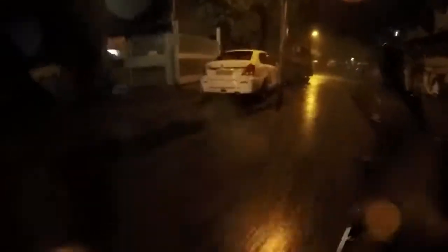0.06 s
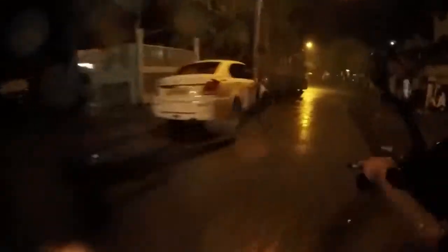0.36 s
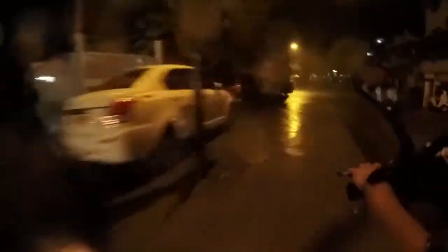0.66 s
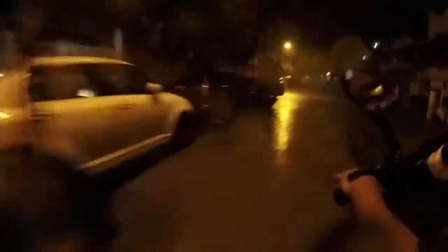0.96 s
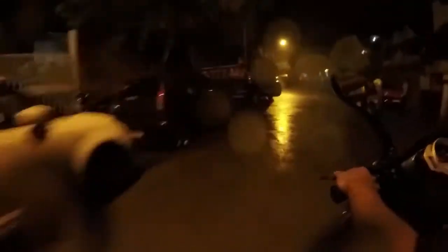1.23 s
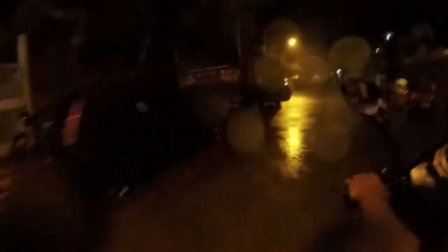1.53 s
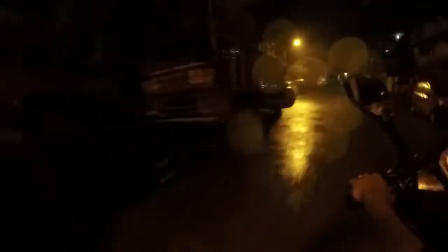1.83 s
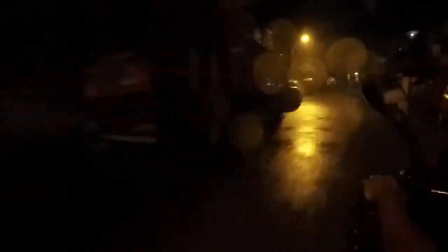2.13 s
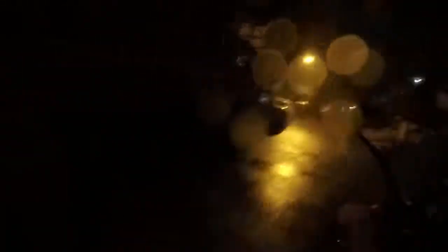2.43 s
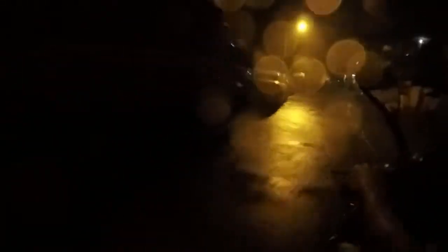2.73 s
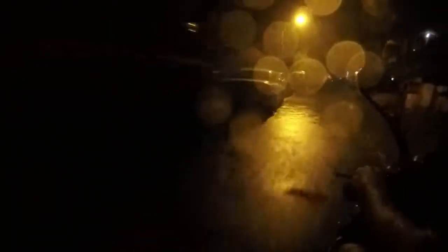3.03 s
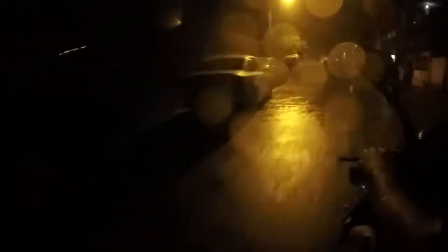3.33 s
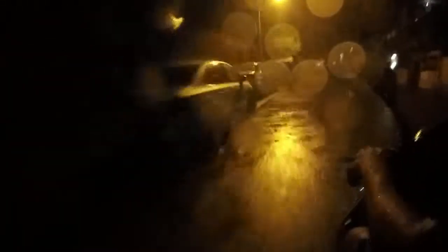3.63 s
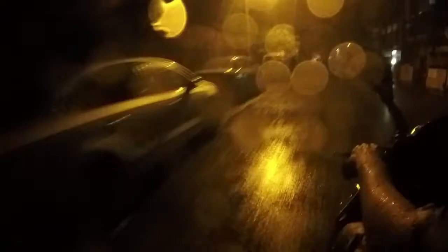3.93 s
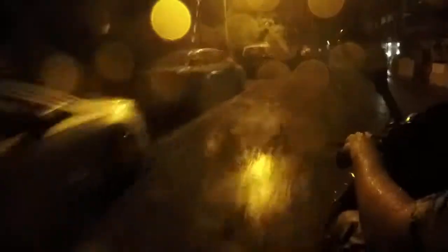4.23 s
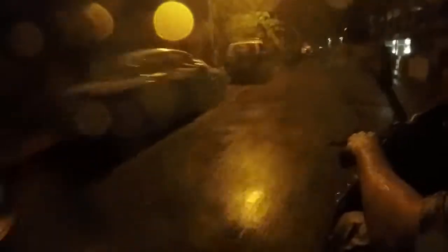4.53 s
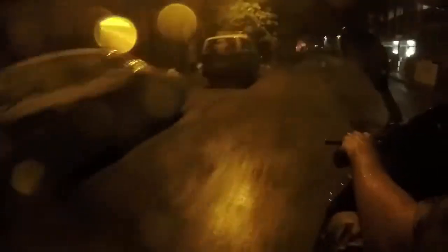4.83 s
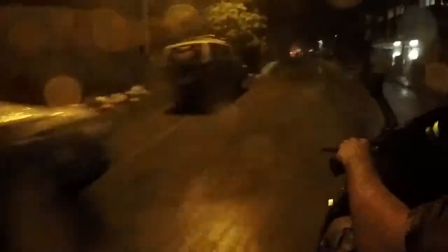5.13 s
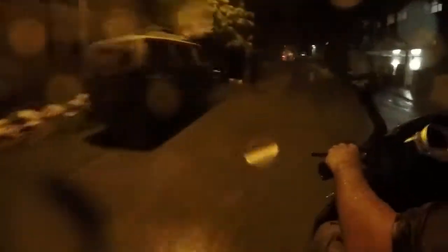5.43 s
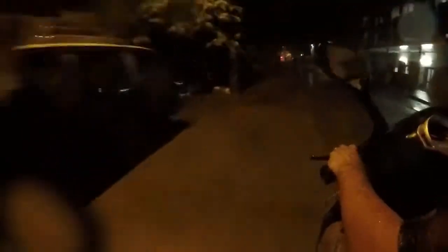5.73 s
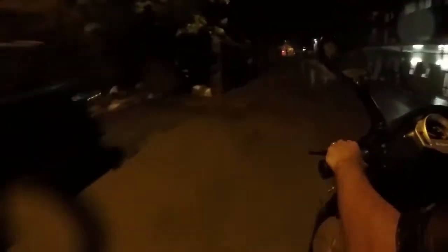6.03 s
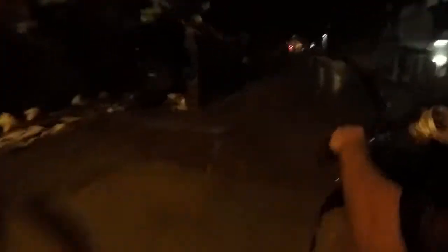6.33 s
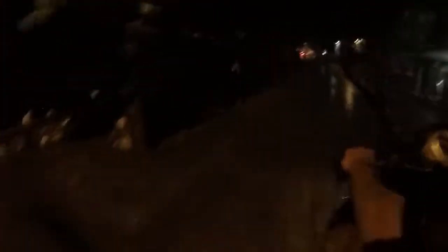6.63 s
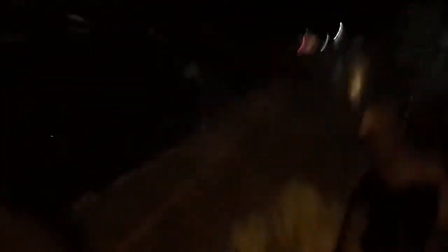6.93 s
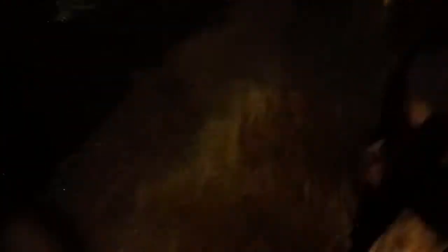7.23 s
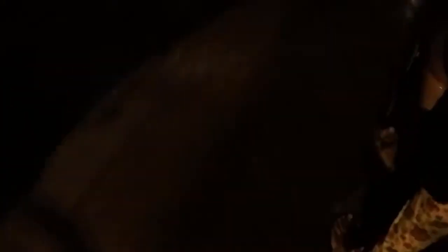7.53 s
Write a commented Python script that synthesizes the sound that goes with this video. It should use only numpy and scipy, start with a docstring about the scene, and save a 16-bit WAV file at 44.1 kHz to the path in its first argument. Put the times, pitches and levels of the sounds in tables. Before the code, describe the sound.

Raindrops strike a plastic camera case on a scooter riding along a wet street. Sharp, irregular taps and finer ticks crackle throughout, with an occasional hollow plop or soft low knock. Underneath run a low wind rumble, road hum, muffled tyre spray and a faint engine. The wind swells at the start and again near the end. The microphone is inside the case, so the drops sound very close.

```python
"""Rain on a scooter's camera case

A scooter rides along a wet street in the rain, with a camera in a waterproof plastic case.
Each drop excites the case's modes for a few milliseconds; the hardest overload the microphone.
Underneath are wind rumble, road hum, tyre spray heard through the shell, a faint engine
and a few low thuds: soft knocks of the mount and brief thumps of overload."""
import sys
import numpy as np
from scipy import signal
from scipy.fft import rfft, irfft, next_fast_len
from scipy.io import wavfile
from scipy.ndimage import map_coordinates

SR = 44100
rng = np.random.default_rng(int(sys.argv[2]) if len(sys.argv) > 2 else 0)


def to_wav(s):
    """Save 16-bit WAV."""
    ch = np.atleast_2d(s).T  # columns
    pcm = np.round(np.clip(ch, -1, 1) * 32767)  # PCM
    wavfile.write(sys.argv[1], SR, pcm.astype(np.int16))


N = 338247
TIME = np.arange(N) / SR


def amp(db):
    """Amplitude ratio of a level in decibels."""
    return 10 ** (np.asarray(db) / 20)


def unit(x):
    """Normalisation to rms 1."""
    return x / np.sqrt(np.mean(x ** 2) + 1e-20)


def wobble(rate):
    """Smooth random modulation: a spline through `rate` Gaussian knots a second."""
    return map_coordinates(rng.standard_normal(int(N * rate / SR) + 4), [TIME * rate])


def filtered(x, response):
    """Zero-phase filtering: the spectrum times a response of frequency."""
    size = next_fast_len(N + 8192)
    return irfft(rfft(x, size) * response(np.fft.rfftfreq(size, 1 / SR)), size)[:N]


def noise(spectrum):
    """Coloured noise of rms 1: white noise shaped by a spectral envelope."""
    knots_hz, db = np.transpose(spectrum)
    white = rng.standard_normal(N)
    return unit(filtered(white, lambda hz: amp(np.interp(np.log(hz + 1), np.log(knots_hz), db))))


def butter(x, edge_hz, kind, order):
    """Causal high- or low-pass filtering."""
    return signal.sosfilt(signal.butter(order, edge_hz, kind, fs=SR, output="sos"), x)


def ring(t, hz, t60):
    """Free vibration of a damped mode, falling 60 dB in t60 seconds."""
    return np.sin(2 * np.pi * hz * t) * np.exp(-np.log(1000) * t / t60)


def tap_unit(rows):
    """Energy normalisation: each row equals five milliseconds at rms 1."""
    return rows / np.sqrt(np.sum(rows ** 2, axis=1, keepdims=True) / (.005 * SR) + 1e-20)


def placed(times, rows):
    """Superposition of short sounds at their start times."""
    index = np.round(times * SR).astype(int)[:, None] + np.arange(rows.shape[1])
    return np.bincount(index.ravel(), rows.ravel(), N)[:N]


# Rush of the tyres over the wet road: (time [s], level [dB])
ROAD_RUSH = [(0.0, -40), (0.1, -40), (0.45, -49), (1.07, -51.5), (1.71, -46), (2.16, -47), (2.5, -41),
             (3.33, -45), (3.8, -40.5), (4.38, -47), (5.06, -49), (5.26, -46), (5.7, -48), (5.85, -44),
             (6.13, -50), (6.75, -47), (7.18, -50.5), (7.67, -46)]

def pace(cruise_db=-46):
    """Common modulation: the rush in dB above cruising; a source gains `grows` dB for each dB of it."""
    return np.interp(TIME, *np.transpose(ROAD_RUSH)) - cruise_db


# Gusts on the case: (start [s], length before release [s], rise of the rumble [dB])
GUSTS = [(0, 0.53, 7.5), (2.343, 0.088, 7), (3.804, 0.22, 7), (6.77, 0.73, 8)]

def gusts(attack_s=0.066, release_s=0.068):
    """Trapezoidal envelopes in dB: each gust rises, holds and lets go."""
    return sum(db * np.clip(np.minimum((TIME - start) / attack_s, 1 + (start + length - TIME) / release_s),
                            0, 1) for start, length, db in GUSTS)


# Spectrum of the wind rumble: (frequency [Hz], relative density [dB])
WIND_SPECTRUM = [(4, -19), (12, 7), (26, 2), (45, -3.5), (75, -9), (110, -18), (170, -21), (300, -33.5),
                 (700, -44.5)]

def wind(level_db=-45, grows=0.54):
    """Turbulent pressure buffets the case with a low rumble."""
    buffet_db = 2.1 * wobble(16)
    return amp(level_db + grows * pace() + gusts() + buffet_db) * noise(WIND_SPECTRUM)


# Spectrum of the shaken mount: (frequency [Hz], relative density [dB])
HUM_SPECTRUM = [(90, -8), (160, -1.5), (200, 6), (240, -9), (320, -13.5), (700, -37.5)]

def road_hum(level_db=-54.5, grows=1.13):
    """Forced vibration: the road shakes the mount, which resonates near 200 Hz."""
    shudder_db = 2.5 * wobble(18)
    return amp(level_db + grows * pace() + shudder_db) * noise(HUM_SPECTRUM)


# Spectrum of the spray inside the case: (frequency [Hz], relative density [dB])
SPRAY_SPECTRUM = [(150, -11), (450, -9), (800, -5.5), (1200, -5.5), (1400, -3.5), (1750, 0.5), (2150, -6.5),
                  (2450, -0.5), (3600, -12), (4650, -8), (5600, -20), (6700, -12), (8200, -41),
                  (15000, -47)]

def tyre_spray(level_db=-47.0, grows=0.94):
    """Transmission through the shell colours the hiss of tyres on wet asphalt."""
    sputter_db = .8 * wobble(25) + 1.9 * wobble(160)
    return amp(level_db + grows * pace() + sputter_db) * noise(SPRAY_SPECTRUM)


def engine(firing_hz=66, level_db=-59, grows=0.71, jitter=0.037):
    """Periodic firing gives a harmonic series; the third order falls on the mount's resonance."""
    phase = 2 * np.pi * np.cumsum(firing_hz * (1 + jitter * wobble(24))) / SR
    orders = sum(amp(db + 2.5 * wobble(23)) * np.sin(k * phase) for k, db in enumerate([0, -12, -3], 1))
    return amp(level_db + grows * pace()) * unit(orders)


# Modes of the plastic case: (frequency [Hz], relative level [dB], decay time t60 [s])
CASE_MODES = [(999, -14, 0.014), (1219, -1.5, 0.012), (1410, 3, 0.0084), (1716, -5.5, .015),
              (1937, -5, 0.014), (2397, -6.5, 0.021), (2714, -2.5, 0.018), (2810, -2, 0.013),
              (3307, 0, 0.0084), (3737, -6, 0.012), (4240, -2, 0.01), (4952, -6, 0.0085),
              (5320, -9, 0.0096), (6580, -16.5, 0.01), (10550, -3.5, 0.0033)]

def taps(times, db, spot_hz, bright_db, shell_db=-3, focus_db=6, focus_octaves=0.17, scatter_db=2.0,
         contact_s=0.00067, splash_db=-1, splash_t60=0.004, push_db=-27):
    """Impact excitation: a drop rings the spot it hits, spreads into the shell's modes and splashes."""
    t = np.arange(SR // 20) / SR
    hz, mode_db, t60 = np.transpose(CASE_MODES)
    spot = tap_unit(-ring(t, spot_hz[:, None], t60=0.0038))
    # modes near the spot's own pitch take more of the blow; the landing place sets their signs
    near = np.exp(-(np.log2(hz / spot_hz[:, None]) / focus_octaves) ** 2)
    side, scatter = rng.standard_normal((2, len(times), len(hz)))
    shares = np.sign(side) * amp(mode_db + focus_db * near + scatter_db * scatter)
    shell = tap_unit(shares @ ring(t, hz[:, None], t60[:, None]))
    # the force builds while the drop flattens; the stiff wall passes little below its modes
    rise = 1 - np.exp(-t / contact_s)
    body = tap_unit(butter(rise * (spot + amp(shell_db) * shell), 590, "high", order=3))
    burst = rise * rng.standard_normal((len(times), len(t))) * np.exp(-np.log(1000) * t / splash_t60)
    splash = tap_unit(butter(butter(burst, 2300, "high", order=2), 1780, "low", order=1))
    # the weight of the drop also gives the whole case one brief push
    push = tap_unit(ring(t, hz=430, t60=0.00059)[None])
    sounds = body + amp(bright_db + splash_db)[:, None] * splash + amp(push_db) * push
    return butter(placed(times, amp(db)[:, None] * sounds), 10200, "low", order=2)


# Big drops on the case: (time [s], level [dB], pitch of the struck spot [Hz], splash brightness [dB])
BIG_DROPS = [(.0257, -18, 2270, -9), (.09, -17.5, 1390, -6.5), (.2472, -15, 2710, -2),
             (.2854, 1, 1560, -19), (.4055, -19.5, 1390, -5), (.4404, -22.5, 2830, -6.5),
             (.7703, -2.5, 1834, -8.5), (0.7859, -24.5, 2190, -12), (.9174, -20.5, 1620, -6.5),
             (.933, -26, 1970, -12), (1.029, -13, 2580, -8), (1.0614, -30, 2300, 0.5),
             (1.077, -27, 2560, -22), (1.23, -19, 2430, -9), (1.315, -18, 2240, -18),
             (1.394, -12.5, 3780, -7.5), (1.4962, -33.5, 2750, -7), (1.6015, -20.5, 3300, -12.5),
             (1.746, -26, 2330, 0.5), (1.8569, -9, 2570, -4), (1.8721, -10.5, 2140, -33),
             (1.883, -5, 2620, -28), (2.0051, -23.5, 1400, -5), (2.0503, -6.5, 1740, -13.5),
             (2.1617, -17.5, 2410, -9.5), (2.3464, -19, 3000, -11), (2.3928, -18.5, 2960, -19),
             (2.4235, -23, 1640, -21), (2.4654, -29.5, 3300, 0.5), (2.52, -11.5, 1700, -25),
             (2.5644, -13.5, 1440, -3), (2.6047, -26, 2560, -8.5), (2.7788, -8, 2220, -15),
             (2.9216, -15.5, 1010, -11), (2.9465, -8.5, 1430, -3), (2.9882, -8.5, 2340, -39),
             (3.051, -28.5, 2700, -2), (3.1364, -10.5, 1730, 8), (3.146, -25, 1520, -30),
             (3.3154, -26, 2730, -1.5), (3.38, -15, 2300, -13), (3.4015, -12.5, 3350, -13),
             (3.4655, -29, 2780, -12), (3.6265, -22.5, 960, -18), (3.7295, -23, 2290, -14),
             (3.7539, -11, 1340, -9), (3.9045, -3.5, 3230, -20), (3.969, -7.5, 1810, -9),
             (4.0863, -24, 1290, 0.5), (4.1071, -5.5, 1820, -10.5), (4.1815, -32.5, 1340, -6),
             (4.234, -17.5, 1950, 1), (4.2803, -28.5, 2300, -0.5), (4.301, -29, 4500, -10),
             (4.356, -7.5, 2480, -16), (4.5152, -6, 1835, -8.5), (4.6298, -14, 4120, -11.5),
             (4.6805, -29.5, 3970, -11), (4.72, -15, 3000, -2.5), (4.8006, -18.5, 1560, -18),
             (4.844, -8.5, 1800, -12), (5.0133, -19, 1980, -16), (5.071, -24, 1860, -11),
             (5.0858, -20, 2720, -12), (5.0968, -13, 2750, -11), (5.2926, -16, 1800, -13),
             (5.3082, -12.5, 4140, -16), (5.3347, -24, 2750, -0.5), (5.4116, -5, 1900, -10),
             (5.4349, -15, 1820, -20), (5.4555, -24, 1300, -26), (5.477, -20.5, 2580, -19),
             (5.521, -18, 940, -26), (5.5284, -17.5, 1890, -11.5), (5.686, -23.5, 1500, -10),
             (5.707, -13, 1850, -14), (5.7815, -27, 1160, -8), (5.8176, -24.5, 2530, -5),
             (5.8596, -22.5, 1530, -8), (5.9094, -17.5, 2300, -15), (5.929, -25.5, 2520, 2),
             (5.94, -12, 3860, -9), (6.0116, -1.5, 1915, -14), (6.1331, -20.5, 1700, -9.5),
             (6.3373, -10.5, 4250, -12), (6.408, -19.5, 1860, -17), (6.475, -8, 1840, -19),
             (6.493, -13, 2400, -7), (6.6123, -13.5, 3100, -10), (6.6278, -16, 2530, -34),
             (6.637, -15.5, 2140, -14), (6.6781, -14, 1990, -20), (6.769, -17.5, 2470, -12.5),
             (6.7768, -25.5, 1260, 3), (6.9102, -11, 2630, -13.5), (6.9514, -19, 1400, -15),
             (6.9578, -5.5, 1950, -8), (7.1263, -13, 1240, -2), (7.2768, -26.5, 3240, -10.5),
             (7.4049, -22.5, 2380, -11), (7.4649, -21.5, 2180, -32), (7.482, -7.5, 2300, -10.5),
             (7.4932, -24.5, 2530, 1.5), (7.541, -26.5, 2680, -7)]

def rain():
    """Discrete impacts: big drops strike the case one by one."""
    times, db, spot_hz, bright_db = np.transpose(BIG_DROPS)
    return taps(times, db, spot_hz, bright_db)


def spatter(count=60, delay_s=0.015, level_db=-45, spread_db=4, centre_hz=2500, octaves=0.33,
            bright_db=-6):
    """Secondary impacts: big drops burst and fling droplets that land a moment later."""
    bursts = rng.choice(np.transpose(BIG_DROPS)[0], count)
    flight, size, place = rng.standard_normal((3, count))
    times = bursts + delay_s * np.exp(.5 * flight)
    spot_hz = centre_hz * 2 ** (octaves * place)
    return taps(times, level_db + spread_db * size, spot_hz, np.full(count, bright_db))


def wet_times(count):
    """A random point process: landings are denser where the road throws up more spray."""
    wetness = np.cumsum(amp(pace()))
    return np.interp(rng.uniform(0, 1, count), wetness / wetness[-1], TIME)


def drizzle(count=280, level_db=-48, grows=0.29, spread_db=7.5, cruise_cap_db=-35, centre_hz=2400,
            octaves=.45):
    """Random light impacts: small drops tick between the big ones, harder with the pace."""
    times = wet_times(count)
    size, place, burst = rng.standard_normal((3, count))
    db = np.minimum(level_db + spread_db * size, cruise_cap_db) + grows * np.interp(times, TIME, pace())
    spot_hz = centre_hz * 2 ** (octaves * place)
    return taps(times, db, spot_hz, bright_db=-5 + 4 * burst + size)


def mist(count=220, level_db=-56, spread_db=4.0, centre_hz=5200, octaves=.4, bright_db=3):
    """Weak excitation: the finest droplets barely stir the shell and only sparkle."""
    size, place = rng.standard_normal((2, count))
    spot_hz = centre_hz * 2 ** (octaves * place)
    return taps(wet_times(count), level_db + spread_db * size, spot_hz, np.full(count, bright_db))


# Fat, soft drops that land with a hollow plop: (time [s], level [dB], pitch [Hz])
SOFT_DROPS = [(0.154, -28.5, 610), (1.559, -20.5, 997), (2.287, -8.5, 636), (2.623, -26, 605),
              (3.318, -29, 1020), (3.626, -30, 960), (5.057, -27, 580), (5.484, -28, 580), (5.49, -26, 920),
              (5.521, -52, 905), (6.778, -14, 1044)]

def plops(t60=0.027, overtone_ratio=1.92, overtone_db=3, overtone_t60=0.0051, tick_db=-22):
    """Slow contact favours low frequencies: a low ring, one short overtone and only a faint tick."""
    times, db, hz = np.transpose(SOFT_DROPS)
    t = np.arange(SR // 10) / SR
    fundamental = ring(t, hz[:, None], t60)
    overtone = amp(overtone_db) * ring(t, overtone_ratio * hz[:, None], overtone_t60)
    # opposite signs: the two rings partly cancel at first
    rings = placed(times, amp(db)[:, None] * (fundamental - overtone))
    ticks = taps(times, db + tick_db, spot_hz=np.full(len(db), 2850), bright_db=np.full(len(db), -9))
    return butter(rings, 570, "high", order=4) + ticks


# Low thuds: soft knocks of the mount, and brief broadband thumps where hard drops overload the
# microphone (the two shortest): (time [s], relative level [dB], decay time t60 [s])
THUDS = [(1.856, -38, 0.036), (1.883, -22, 0.024), (2.92, -29.5, 0.14), (2.946, -40, 0.084),
         (3.753, -27, 0.033), (5.52, -29, 0.09), (6.012, -11.5, 0.0086), (6.475, -15, 0.0069),
         (7.129, -29, 0.015), (7.467, -35, 0.14)]
# Modes that make up a thud: (frequency [Hz], relative level [dB], share of the thud's t60 [ratio])
THUD_MODES = [(69.4, -20, 0.44), (140, -34, 0.32), (206, 7.5, 0.83), (218, -1, 0.16), (376, -2.5, 0.66),
              (577, 4.5, 0.41)]

def low_thuds(level_db=-3, scatter_db=2):
    """Damping sets bandwidth: low modes ring as a knock of the mount or, cut short, an overload thump."""
    times, db, t60 = np.transpose(THUDS)
    t = np.arange(SR // 6) / SR
    thuds = 0
    for hz, mode_db, share in THUD_MODES:
        gain = amp(mode_db + scatter_db * rng.standard_normal((len(times), 1)))
        thuds += gain * ring(t, hz, share * t60[:, None])
    return placed(times, amp(db + level_db)[:, None] * thuds)


def scene():
    """Superposition: all the sounds add at the one microphone inside the case."""
    ride = wind() + road_hum() + tyre_spray() + engine()
    water = rain() + spatter() + drizzle() + mist() + plops()
    return (ride + water + low_thuds())[None]


def record(dry, ceiling=.97, top_hz=15500):
    """Saturation flattens the hardest taps near full scale; a steep low-pass limits the band."""
    clipped = dry[0] / (1 + np.abs(dry[0] / ceiling) ** 7) ** (1 / 7)
    return filtered(clipped, lambda hz: 1 / (1 + (hz / top_hz) ** 90))[None]


dry = scene()
out = record(dry)
to_wav(out)
```